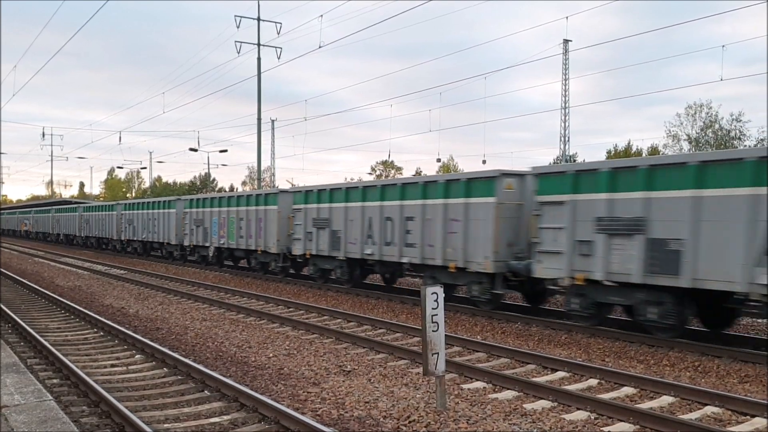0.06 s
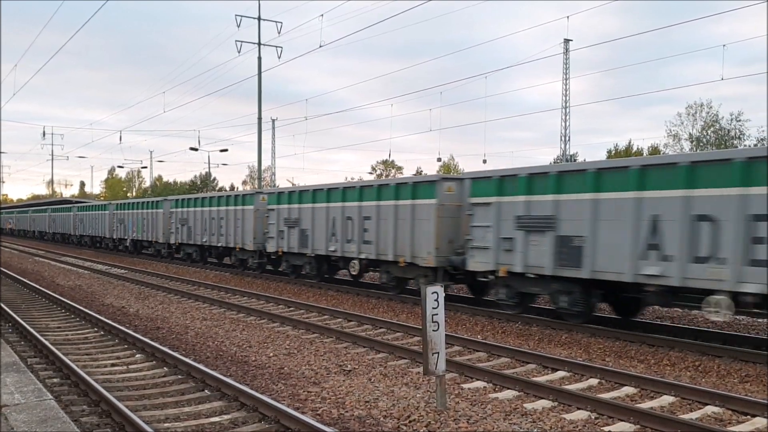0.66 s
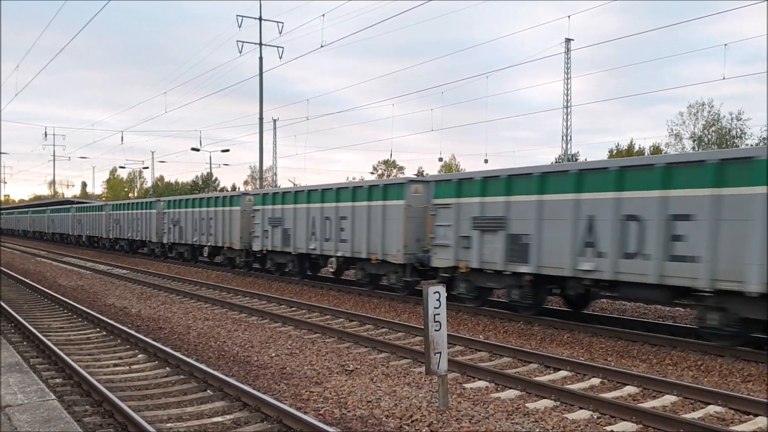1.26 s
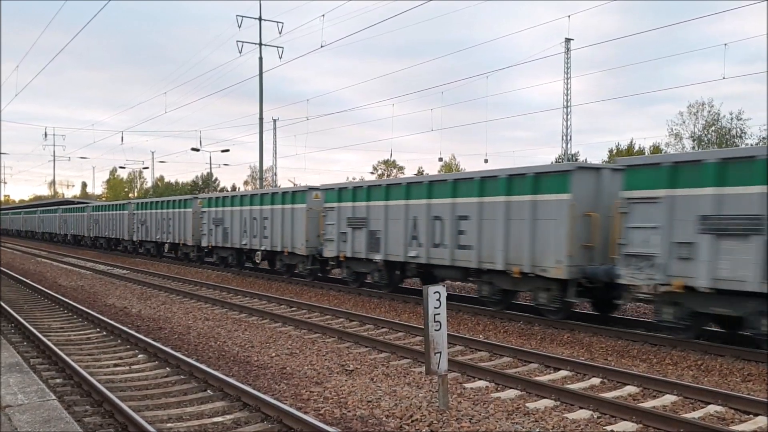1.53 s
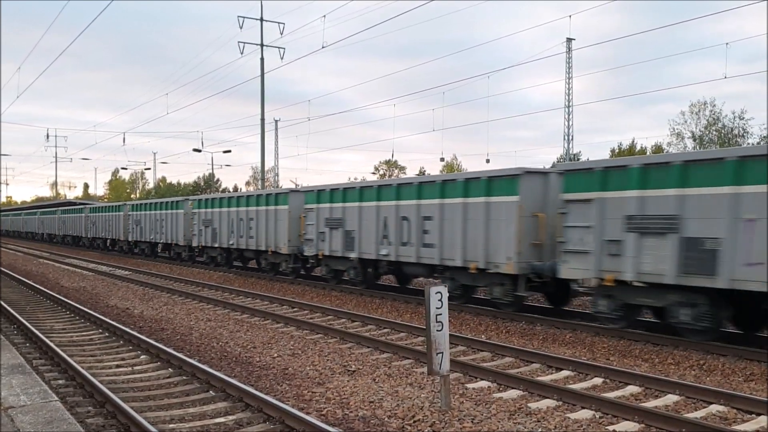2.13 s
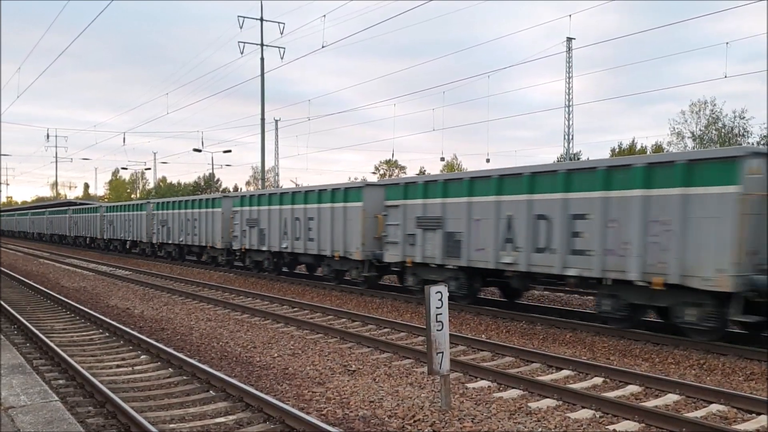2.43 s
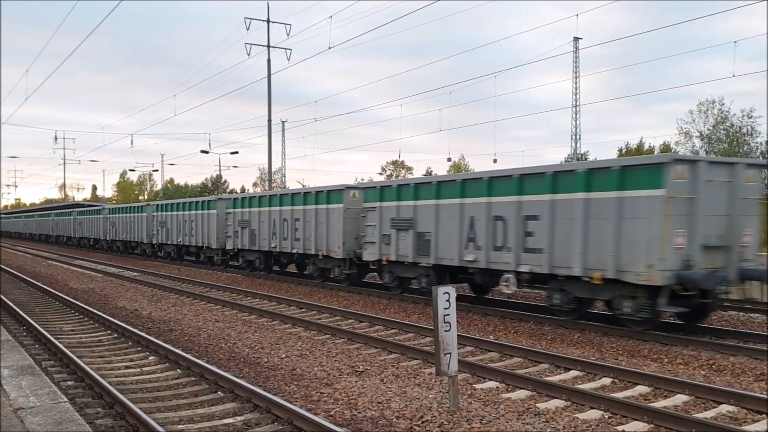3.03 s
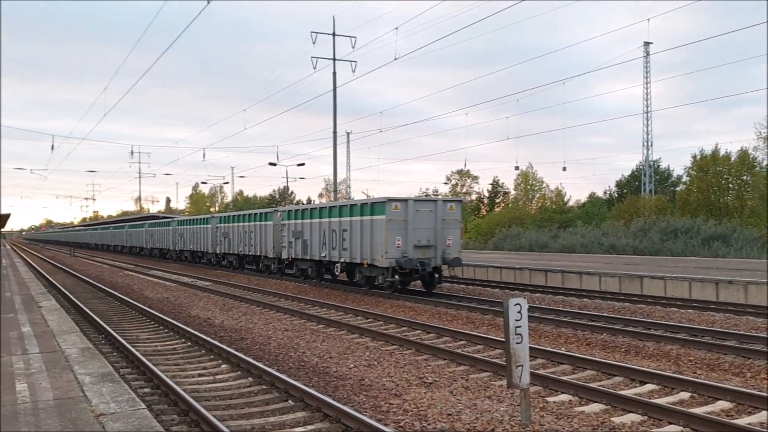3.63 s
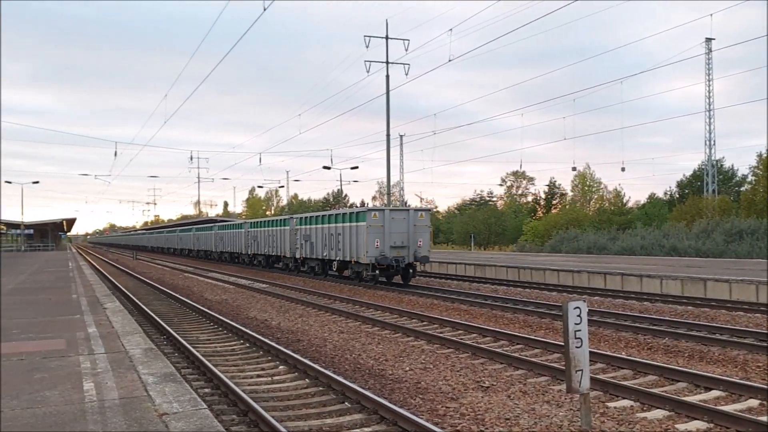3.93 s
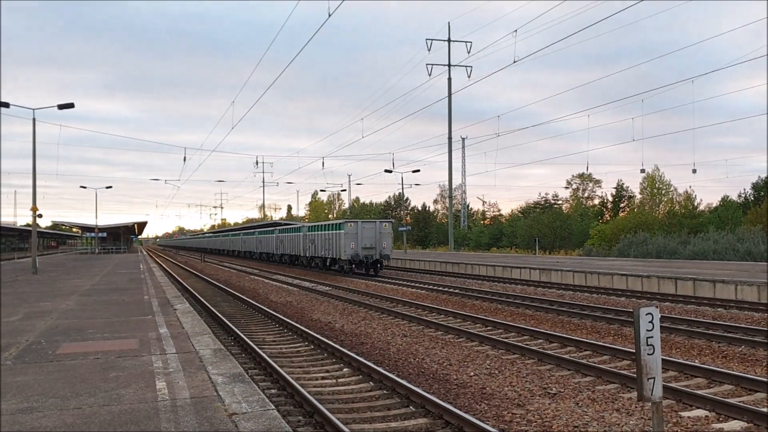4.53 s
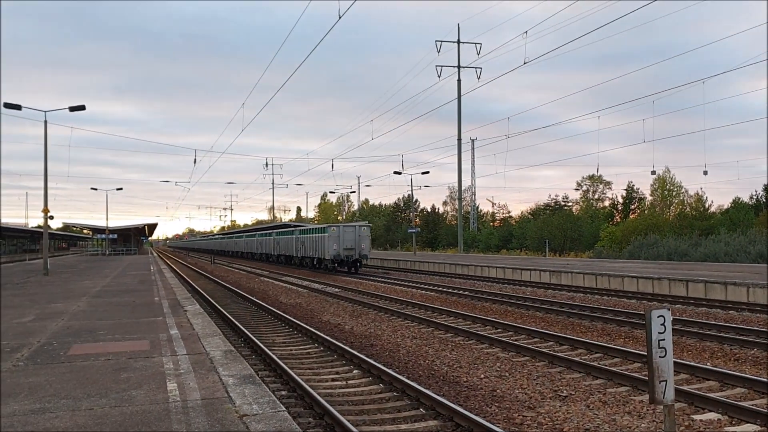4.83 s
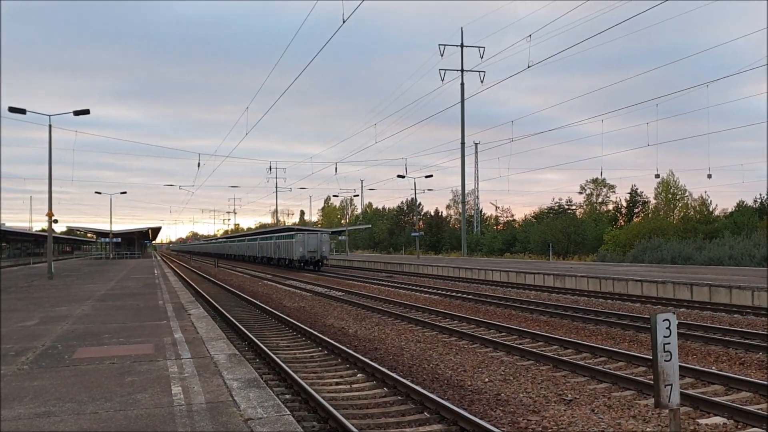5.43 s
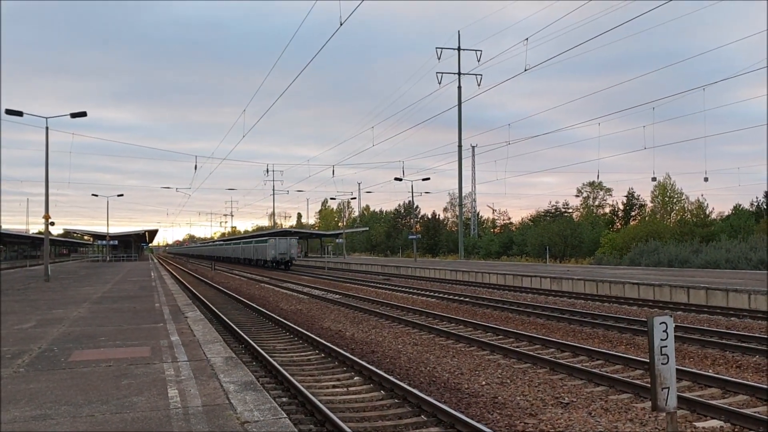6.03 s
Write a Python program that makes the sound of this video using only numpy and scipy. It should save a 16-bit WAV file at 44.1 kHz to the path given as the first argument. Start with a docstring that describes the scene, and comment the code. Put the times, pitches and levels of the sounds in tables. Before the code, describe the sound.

The last wagons of a freight train pass a station platform, heard in stereo from across the tracks. Wind briefly buffets the left microphone as a deep rumble and steel roar fill the air. Worn wheels thump about seven times a second, with clanks, small metal chinks and a scraping hiss. The knocking grows sharper, then the train moves away from about halfway, leaving faint squeals and soft, regular thumps.

```python
"""A freight train rolls away

The last wagons pass a station platform from right to left and fade into the distance.
Rough steel on steel makes wheels, rails and wagon bodies roar. Worn wheels thump and knock about
seven times a second, and the running gear clanks. Two microphones listen from across the tracks."""
import sys
import numpy as np
from scipy import signal
from scipy.fft import rfft, irfft, next_fast_len
from scipy.io import wavfile
from scipy.ndimage import uniform_filter1d

SR = 44100
rng = np.random.default_rng(int(sys.argv[2]) if len(sys.argv) > 2 else 0)


def wrap_up_sound(samples):
    """Save the sound to the file named by the first command line argument, as 16-bit audio."""
    columns = np.atleast_2d(samples).T
    # keep every value between -1 and 1, then stretch to whole-number steps
    tamed = np.clip(columns, -1, 1)
    steps = np.round(tamed * 32767).astype(np.int16)
    wavfile.write(sys.argv[1], SR, steps)


N = 276948
TIME = np.arange(N) / SR

# Where the train is. Each row: time in seconds, distance (0 alongside, 1 leaving, 2 far away).
TRAIN_PATH = [(0, 0), (2.3, 0.089), (2.8, 0.25), (3.1, 0.46), (3.4, 0.75), (4.2, 1.47), (4.9, 1.53),
              (6.28, 1.46)]
# How their housing makes the two microphones differ. Each row: frequency in Hz, likeness (1 is
# identical) and the left one's lead in radians with the train alongside, then both with it far off.
MIC_HOUSING = [(60, 0.8, 0.13, 0.99, 0.21), (202, 0.79, -0.75, 1, -0.38), (494, 0.86, -1.2, 0.94, -0.4),
               (740, 0.58, -1.57, 1, 0.4), (917, 0.91, -2, 0.13, -1.5), (1090, 0.81, -3, 0.29, -1.4),
               (1243, 0.41, 2.5, 0.63, 0.5), (1380, 0.94, 2, 0.24, 1.5), (1615, 0.39, 3, 0.4, 0),
               (1704, 0.16, 1.5, 0.68, -0.8), (1770, 0.49, 0, 0.7, -0.4), (2110, 0.66, 0.1, 0.72, 0.7),
               (2350, 0.46, 0.6, 0.56, 1.2), (2620, 0.24, -2.5, 0.28, -1.8), (2950, 0.95, -0.55, 0.29, 3.2),
               (3100, 0.54, -1.5, 0.36, 1.5), (3400, 0.3, -3.0, 0.16, -0.7), (3620, 0.41, 3, 0.29, 0.7),
               (4290, 0.17, 0.7, 0.45, 0.95), (4660, 0.16, -0.4, 0.41, 1.2), (5350, 0.13, -2, 0.19, 1.2),
               (7100, 0.12, -0.8, 0.31, 2.1), (8350, 0.12, 0, 0.14, 1.3), (10500, 0.12, 1.5, 0.15, -3.04),
               (11800, 0.13, 4.5, 0.17, -1), (13000, 0.12, 1.5, 0.26, -3)]


def rolling():
    """Rough wheels on rough rails shake the ground, the wagon bodies, the rails and the wheels."""
    # The tone of the ground and of the rails. Each row: frequency in Hz, relative level in dB.
    ground_tone = [(15, -30), (28, -29), (37, -4), (47, 4.5), (57, 7), (72, 1.5), (90, -1), (115, -11.5),
                   (200, -48.5)]
    rail_tone = [(250, -59), (380, -23), (460, 2.5), (560, 0.5), (720, 3), (830, -2), (1000, -4.5),
                 (1150, -21), (1600, -54)]
    # How hard the ground and the bodies shake. Each row: time in seconds, relative level in dB.
    ground_levels = [(0, -26), (.42, -29), (.56, -30), (.63, -36), (.72, -28), (1.6, -32), (2.2, -27),
                     (2.8, -26), (3.3, -32), (4.2, -38.5), (5, -42), (6.28, -40)]
    body_levels = [(0.42, -25), (0.63, -31.5), (0.69, -25.5), (0.77, -29), (1.2, -30.5), (2.42, -24),
                   (3.0, -31), (3.3, -32), (3.88, -39.5), (5.9, -42)]
    # How loud the steel roars. Each row: time in seconds, relative rail and wheel levels in dB.
    steel_levels = [(0.0, -40.5, -30.5), (0.31, -36.5, -31.5), (0.56, -40.5, -33.5), (1.22, -39, -33.5),
                    (2.12, -37, -30), (2.97, -36, -33), (3.65, -43, -39), (4.81, -52, -49),
                    (6.19, -52.5, -52), (6.28, -48, -49)]
    ground_db, = curves(ground_levels, TIME)
    body_db, = curves(body_levels, TIME)
    rail_db, wheel_db = curves(steel_levels, TIME)
    ground = roar(steady(ground_tone), patchy_db=-1, patch_s=0.089, patch_hz=40, size=4096)
    body = roar(body_colour, patchy_db=1.5, patch_s=0.045, patch_hz=40, size=4096)
    rail = roar(steady(rail_tone), patchy_db=1.5, patch_s=0.046, patch_hz=148, size=1024)
    wheels = roar(wheel_colour, patchy_db=2.5, patch_s=0.043, patch_hz=43.4, size=4096)
    contact = flutter(depth_db=0.8, rate_hz=17.4)  # one contact drives both wagon and rail
    body *= gain_of(body_db + 0.37) * contact
    rail *= gain_of(rail_db + 0.4) * contact * flutter(depth_db=0.5, rate_hz=82)
    wheels *= gain_of(wheel_db + 2.5) * flutter(depth_db=1, rate_hz=11.7)
    return gain_of(ground_db) * ground + body + rail + wheels


def wheel_colour(t, hz):
    """Steel wheels ring at many pitches, blurred nearby and mostly sharper far away. Gives dB."""
    # The ringing at three distances. Each row: pitch in Hz, width in Hz, relative level in dB.
    near = [(1248, 270, -3), (1347, 410, -1.5), (1825, 75, -7.5), (1920, 310, -8), (2180, 370, -5.5),
            (2735, 660, -9.5), (2820, 330, -7.5), (3395, 570, -10), (4330, 640, -16), (5160, 2400, -18.5)]
    leaving = [(1217, 205, 0.5), (1824, 95, -1), (2010, 380, -8), (2630, 590, -9), (3050, 520, -13.5),
               (3400, 210, -14.5), (4210, 84, -11), (4800, 92, -24)]
    far = [(1190, 120, -1.5), (1396, 150, -1.5), (1860, 170, -2.5), (1960, 810, -11), (2440, 110, -1.5),
           (2760, 730, -9), (3100, 150, -13), (3540, 350, -12.5), (4134, 97, -7.5), (4800, 410, -16.5)]
    power = 0
    for stage, modes in enumerate([near, leaving, far]):
        share = np.maximum(1 - abs(distance(t) - stage), 0)
        power = power + share * resonances(modes, hz)
    return decibels(power)


def body_colour(t, hz):
    """Wagon bodies rumble, and their panels drone for a while as they pass. Gives dB."""
    # The rumble nearby and far away. Each row: frequency in Hz, relative level in dB.
    near = [(60, -48), (90, -1.5), (120, 1), (160, 0.5), (190, -2), (250, -4.5), (320, -7.5), (400, -13),
            (500, -31), (900, -43)]
    far = [(60, -39), (90, -8), (120, 0), (155, 2.5), (190, -3.5), (230, -3.5), (275, -8), (330, -11.5),
           (400, -12.5), (500, -17), (900, -50)]
    peak_s, spread_s, drone_hz, width_hz, drone_db = 1.5, 0.87, 411, 61, 5.5
    swell = np.exp(-((t - peak_s) / spread_s) ** 2)
    band = 1 / (1 + ((hz - drone_hz) / width_hz) ** 4)
    return by_distance(near, far)(t, hz) + drone_db * swell * band


def wheel_strikes():
    """Worn wheels boom, knock and clank as they pass, then keep thumping once a turn as they recede."""
    # Deep booms. Each row: time in seconds, relative level in dB, pitch in Hz.
    passing_booms = [(0.09, -17, 73.6), (0.22, -15, 68.3), (0.3, -23, 73), (0.37, -20, 80),
                     (0.43, -19, 61.8), (0.7, -18, 65.86), (0.78, -26, 57.5), (0.88, -21, 63.1),
                     (0.93, -20, 60.4), (0.97, -18, 68.2), (1.08, -20.5, 73.6), (1.19, -20.0, 63.7),
                     (1.26, -29, 65.34), (1.32, -28, 68.3), (1.4, -23, 60.5), (1.44, -18.5, 67.5),
                     (1.5, -24, 59.5), (1.57, -21.5, 57), (1.62, -22.5, 71.9), (1.68, -20.5, 61.75),
                     (1.76, -17, 73.1), (1.87, -23.5, 71.9), (1.94, -25, 58.6), (2.06, -13.5, 60.4),
                     (2.15, -16.5, 73.5), (2.2, -10.5, 67.7), (2.33, -17.5, 69.4), (2.41, -28, 73.3),
                     (2.48, -18, 59.9), (2.55, -23, 74.6), (2.62, -29, 60.33), (2.69, -16.5, 65.4),
                     (2.75, -14.5, 69.66), (2.84, -14.5, 72.2), (2.92, -30, 72.8), (3.01, -28, 57.8),
                     (3.07, -22, 68.2), (3.15, -20.5, 62), (3.2, -23.5, 72.8), (3.27, -26, 64.5),
                     (3.35, -30, 66.1), (3.43, -25.5, 68.2), (3.49, -23, 67.83), (3.57, -24, 66.9),
                     (3.64, -24.0, 69.9), (3.71, -22, 68.2), (3.78, -23, 66.95), (3.86, -28, 66.6),
                     (3.94, -23, 68), (3.99, -23.5, 64.9), (4.07, -38, 67.7)]
    # Wheels knock on the rail. Each row: start in seconds, level in dB.
    passing_knocks = [(0.94, -32), (1.738, -35), (2.172, -25.5), (2.301, -27), (2.436, -23), (2.458, -28),
                      (2.569, -23.5), (2.592, -26.5), (2.655, -25), (2.71, -22), (2.789, -27.5),
                      (2.853, -23), (2.911, -27.5), (2.928, -29), (2.979, -27), (2.991, -25.5),
                      (3.062, -30), (3.125, -29), (3.203, -25.5), (3.34, -29.5), (3.428, -37), (3.49, -34),
                      (3.629, -37), (3.76, -40), (3.9, -41), (4.041, -32), (4.192, -38)]
    # Wheels are jolted. Each row: start in seconds, relative level in dB, boosted pitch in Hz.
    passing_clanks = [(1.42, -23, 1350), (1.735, -21, 1354), (1.791, -20.5, 1384), (1.915, -29, 1340),
                      (1.932, -23.5, 2105), (1.986, -20, 1334), (2.009, -24, 2025), (2.119, -25, 1380),
                      (2.207, -24, 1390), (2.434, -27, 1272), (2.52, -24, 2228), (2.652, -19, 1400),
                      (2.779, -28, 2120), (2.855, -29, 2110), (2.98, -22, 1273), (3.122, -33, 1320),
                      (3.212, -36, 1840), (3.268, -23.5, 1230), (3.319, -29, 1836), (3.345, -27, 1310),
                      (3.416, -40, 1797), (3.467, -29, 1260), (3.54, -29, 1224), (3.616, -30.5, 1880),
                      (3.654, -29.5, 1830), (3.718, -40, 1828), (3.904, -33, 1827), (4.044, -40, 1825),
                      (4.095, -38, 1820), (4.335, -38, 1842), (4.403, -43, 1823), (4.5, -38, 1827)]
    # Wheels with a flat spot. Each row: the times in seconds when it passes and when its far-off
    # strikes begin and end, then the relative levels of its boom, knock and clank in dB.
    worn_wheels = [(2.301, 4.08, 6.28, -21.5, -26, -25), (2.652, 4.12, 6.28, -26, -25, -31)]
    # How boom, knock and clank carry. Each row: metres down the track where it is loudest,
    # dB lost each time the distance doubles.
    carry = [(-12, 1.5), (8, 10.5), (-2, 9)]
    turn_s, speed_m_per_s, to_track_m, sound_m_per_s = 0.1325, 22, 8, 343
    scatter_db, boom_lag_s, boom_hz, clank_hz = 1.9, 0.025, 70.8, 1810
    booms, knocks, clanks = list(passing_booms), list(passing_knocks), list(passing_clanks)
    loudest_m, fall_db = np.transpose(carry)
    for passes_s, begin_s, end_s, *levels in worn_wheels:
        for since_s in np.arange(32) * turn_s:
            along_m = speed_m_per_s * since_s
            delay_s = (np.hypot(to_track_m, along_m) - to_track_m) / sound_m_per_s
            heard_s = passes_s + since_s + delay_s
            doublings = np.log2(np.hypot(1, (along_m - loudest_m) / to_track_m))
            uneven_db = scatter_db * rng.standard_normal(len(levels))
            boom_db, knock_db, clank_db = levels - fall_db * doublings + uneven_db
            if begin_s < heard_s < end_s:
                booms.append((heard_s + boom_lag_s, boom_db, boom_hz))
                knocks.append((heard_s, knock_db))
                clanks.append((heard_s, clank_db, clank_hz))
    return booms, knocks, clanks


def wagon_booms(rows, length_s=0.12, level_db=-4):
    """Each strike makes an empty wagon boom: a short, deep tone with a wobbling pitch."""
    window = np.hanning(round(length_s * SR))
    power = np.zeros(N)
    for middle_s, db, _ in rows:
        add(power, middle_s - length_s / 2, (gain_of(db + level_db) * window) ** 2)
    _, pitch_hz = curves(sorted(map(tuple, rows)), TIME)
    wobble = flutter(depth_db=6, rate_hz=7)
    cycles = np.cumsum(pitch_hz + 3 * (wobble - wobble.mean())) / SR + rng.random()
    balance = gain_of([[0.2], [-0.2]])  # a little louder on the left
    return np.sqrt(2 * power) * np.sin(2 * np.pi * cycles) * balance


def track_knocks(rows):
    """The track rings when a wheel hits it; its lowest note fades as the train leaves."""
    # How the track rings. Each row: pitch in Hz, width in Hz, relative level in dB.
    modes = [(268, 210, -7.5), (567, 140, 0), (715.5, 110, 1), (860, 380, -7), (1314, 108, -6),
             (2300, 1900, -18)]

    def colour(t, hz):
        bass_loss_db = 14 * np.minimum(distance(t), 1) ** 0.81 * np.exp(-(hz / 430) ** 4)
        return decibels(resonances(modes, hz)) - bass_loss_db
    return blows(rows, colour, contact_s=0.0095, rattle=0.19, detune=0.075, spread=0.17, level_db=0)


def low_thuds():
    """Low thuds: two puffs of wind on the microphone, then thuds from passing wagons."""
    # Each row: start in seconds, relative level in dB.
    thuds = [(0.052, -22), (0.128, -19), (0.835, -24), (0.857, -29), (0.995, -26), (1.058, -23),
             (1.548, -22), (1.68, -32), (1.917, -16.5), (1.995, -22), (2.055, -20), (2.185, -20),
             (2.222, -30), (2.302, -20.5), (2.452, -27), (2.735, -32), (2.912, -19), (2.985, -25),
             (3.38, -35), (3.695, -32)]
    # The low notes in a thud. Each row: pitch in Hz, width in Hz, relative level in dB.
    modes = [(165, 62, -2), (246, 114, 3.5), (358, 170, -4)]
    return blows(thuds, lambda t, hz: decibels(resonances(modes, hz)),
                 contact_s=0.016, rattle=0.15, detune=0.13, spread=0.27, level_db=-3)


def wheel_clanks(rows, top_hz=2900):
    """A heavy jolt sets a wheel ringing, but hardly stirs its notes above top_hz."""
    def colour(t, hz, pitch):
        return wheel_colour(t, hz) - decibels(1 + (hz / top_hz) ** 6) + favoured(hz, pitch)
    return blows(rows, colour, contact_s=0.01, rattle=0.11, detune=0.012, spread=0.27, level_db=-5.5)


def rubbing():
    """Wheels and their rims scrape the rail with a flickering hiss, and grit crackles under them."""
    # The tone of near hiss, far hiss and grit. Each row: frequency in Hz, relative level in dB.
    hiss_near = [(1500, 4.5), (3800, -0.5), (5300, -1), (6100, -5.5), (6900, -4), (7600, -5.5), (8300, -3),
                 (9600, -9.5), (11000, -8), (12800, -8), (14200, -15), (15600, -23)]
    hiss_far = [(1500, -23), (3800, 1.5), (5400, 0.5), (6300, -9.5), (7000, -5.5), (7700, -10.5),
                (8400, -12.5), (9600, -16.5), (11300, -14), (12200, -16), (14200, -22), (15600, -39)]
    grit_tone = [(2000, -25), (6000, 14), (12500, -7.5), (15600, -4)]
    # How loud the rubbing is. Each row: time in seconds, relative level in dB.
    levels = [(0, -38), (0.6, -45), (1.5, -43.5), (2.6, -39.5), (3.1, -47.5), (3.7, -51.5), (4.4, -54),
              (4.8, -60.5), (6.28, -67.5)]
    # A rim briefly scrapes harder. Each row: time in seconds, extra level in dB.
    scrapes = [(0.12, 4), (0.46, 2.5), (0.65, 2.5), (0.95, 5.5), (1.16, 5), (1.7, 2), (1.97, 0),
               (3.17, 3.5), (3.88, 3)]
    grains_per_s, grain_decay_s, scrape_s = 170, 0.0032, 0.18
    hiss = roar(by_distance(hiss_near, hiss_far), patchy_db=4, patch_s=0.025, patch_hz=100, size=1024)
    hiss *= flutter(depth_db=1, rate_hz=16)
    grain_starts = rng.random(N) < grains_per_s / SR
    grains = grain_starts * gain_of(3.5 * np.minimum(rng.exponential(1, N), 2.5))
    bursts = signal.lfilter([1], [1, -np.exp(-1 / (grain_decay_s * SR))], grains)
    grit = bursts * roar(steady(grit_tone), patchy_db=-2.5, patch_s=0.004, patch_hz=900, size=256)
    level_db, = curves(levels, TIME)
    for middle_s, db in scrapes:
        add(level_db, middle_s - scrape_s / 2, db * np.hanning(int(scrape_s * SR)))
    return gain_of(level_db) * (gain_of(4.5) * hiss + gain_of(-7) * evened(grit))


def squeals():
    """Slipping steel sings fuzzy, overlapping notes, each swelling and fading."""
    # Each row: start in seconds, length in seconds, pitch in Hz, width in Hz, level in dB.
    slips = [(0, 0.51, 2845, 110, -40.5), (0.7, 1.3, 2870, 120, -47.5), (0.875, 0.2, 13500, 2000, -52),
             (1.134, 0.038, 8300, 220, -42), (1.154, 0.022, 5900, 300, -45), (3, 0.29, 1900, 240.4, -44.5),
             (2.945, 0.087, 3340, 90, -38), (3.083, 0.055, 3300, 80, -38), (3.3, 0.043, 1833, 35, -34),
             (3.378, 0.088, 1843, 35, -36), (3.501, 0.45, 1840, 35, -45), (3.88, 0.34, 1808, 25, -46),
             (4.32, 0.115, 1852, 25, -46.5), (4.45, 0.7, 1833, 25, -53), (4.203, 0.15, 2455, 90, -47),
             (3.841, 0.23, 4760, 110, -49.5), (4.22, 0.18, 4800, 110, -55), (3.71, 0.78, 8300, 160.2, -68),
             (3.554, .32, 12400, 1006, -61), (4.04, 0.19, 12500, 1180, -57), (4.34, .12, 12500, 900, -66),
             (4.841, .28, 12200, 599, -66), (5.201, 1.3, 12150, 500, -72), (4.882, 0.28, 6860, 499, -70),
             (5.256, 0.3, 6898, 594, -66), (5.51, 0.48, 6872, 502, -70), (5.981, 0.37, 6910, 600, -69)]
    out = np.zeros((2, N))
    for start_s, length_s, pitch, width, db in slips:
        size = next_fast_len(int(length_s * SR))
        slip = stereo(likeness(start_s + length_s / 2, pitch), *rng.standard_normal((2, size)))
        ring = 1 / (1 + (2 * (np.fft.rfftfreq(size, 1 / SR) - pitch) / width) ** 2)
        tone = evened(irfft(rfft(slip) * ring, size))
        add(out, start_s, gain_of(db) * tone * signal.windows.tukey(size, 0.7))
    return out


def gear_chinks():
    """Loose chains and brake rods hit each other with small, bright chinks."""
    # The hits. Each row: start in seconds, level in dB, boosted pitch in Hz.
    hits = [(0.026, -34, 12800), (0.109, -38, 6900), (0.336, -43, 7500), (0.46, -42, 6960),
            (0.636, -41, 8200), (0.921, -38, 7100), (1.005, -38, 13440), (1.16, -34.5, 13500),
            (1.219, -49, 8200), (1.364, -40, 8100), (1.481, -42, 6960), (1.629, -39, 6900),
            (1.719, -44, 12800), (1.99, -46, 13400), (2.134, -44, 6880), (2.274, -42, 7200),
            (2.463, -44, 8220), (2.584, -41, 7200), (2.649, -42, 7150), (2.921, -46, 7090),
            (3.172, -45, 5700)]
    # How the loose steel rings. Each row: pitch in Hz, width in Hz, relative level in dB.
    modes = [(5500, 1100, -3), (6700, 700, 5), (8200, 630, -8), (10500, 3300, -7), (13200, 2000, -4)]
    return blows(hits, lambda t, hz, pitch: decibels(resonances(modes, hz)) + favoured(hz, pitch),
                 contact_s=0.0039, rattle=0.45, detune=0.04, spread=0.49, level_db=0)


def gust():
    """The train's draught buffets one microphone in uneven puffs."""
    # The tone of the wind. Each row: frequency in Hz, relative level in dB.
    tone = [(20, -16), (40, -14), (75, 6.5), (115, 3.5), (170, 2.5), (250, -9.5), (350, -9.5), (480, -19),
            (900, -64)]
    # Its strength. Each row: time in seconds, level in dB.
    levels = [(0, -25), (.12, -20), (.27, -13.5), (.38, -23), (.5, -33), (.7, -60), (1, -90)]
    eddies = roar(steady(tone), patchy_db=0.5, patch_s=0.02, patch_hz=101, size=2048)[0]
    return gain_of(curves(levels, TIME)[0]) * eddies * flutter(depth_db=2.5, rate_hz=19)


def microphone_hiss():
    """Faint, steady, high microphone hiss."""
    # Its tone. Each row: frequency in Hz, relative level in dB.
    tone = [(300, 19.5), (3000, -10), (8000, -15), (11200, -18), (12200, 1), (13200, -5), (14200, -4.5),
            (15400, -26)]
    return gain_of(-56) * roar(steady(tone), patchy_db=1.5, patch_s=0.061, patch_hz=200, size=1024)


def blows(rows, colour, contact_s, rattle, detune, spread, level_db, rattle_s=0.049):
    """In each blow, a brief rough contact and the rattle after it make the struck part ring."""
    out = np.zeros((2, N))
    t = np.arange(4096) / SR
    hz = abs(np.fft.fftfreq(len(t), 1 / SR))
    force = np.exp(-(t / contact_s) ** 2) + rattle * np.exp(-(t / rattle_s) ** 2)
    for start_s, db, *pitch in rows:
        common, apart = rng.standard_normal((2, len(t))) * force
        contact = np.fft.fft([common + spread * apart, common - spread * apart])
        detuned_hz = hz * (1 + detune * rng.uniform(-0.83, 1))
        log_gain = np.log(gain_of(colour(start_s, detuned_hz, *pitch)))
        ring = np.exp(signal.hilbert(log_gain).conj())  # rings only after the blow, never before
        sound = np.fft.ifft(contact * ring).real
        peak_power = uniform_filter1d((sound ** 2).mean(0), size=300).max()
        add(out, start_s, gain_of(db + level_db) * sound / np.sqrt(peak_power))
    return out


def favoured(hz, pitch, boost_db=15, width_hz=90):
    """Each blow lands so that one pitch rings more strongly. Gives the boost in dB."""
    return boost_db / (1 + ((hz - pitch) / width_hz) ** 2)


def resonances(modes, hz):
    """How a ringing part shares its power among frequencies; the shares add up to 1."""
    power = sum(gain_of(db) ** 2 / (1 + (2 * (hz - f) / width) ** 2) ** 2 for f, width, db in modes)
    return power / power.sum()


def roar(colour, patchy_db, patch_s, patch_hz, size):
    """Stereo noise of level 1, shaped by colour(t, hz) in dB, with patches that swell and fade."""
    t = np.arange(N * 4 // size + 5)[:, None] * size / 4 / SR
    hz = np.fft.rfftfreq(size, 1 / SR)
    common_re, common_im, apart_re, apart_im, patches = rng.standard_normal((5, len(t), len(hz)))
    for axis, steps in enumerate([patch_s / t[1, 0], patch_hz / hz[1]]):  # time, then frequency
        blur = np.expand_dims(signal.windows.gaussian(61, steps / 2), 1 - axis)
        patches = signal.fftconvolve(patches, blur, "same")
    shape = gain_of(colour(t, hz)) * np.ones_like(t)
    shape /= np.linalg.norm(shape, axis=1, keepdims=True)
    noise = stereo(likeness(t, hz), common_re + 1j * common_im, apart_re + 1j * apart_im)
    spectra = shape * gain_of(patchy_db * evened(patches)) * noise
    _, sound = signal.istft(spectra.swapaxes(1, 2), nperseg=size, noverlap=size * 3 // 4)
    return evened(sound[:, :N])


def flutter(depth_db, rate_hz):
    """A gain that jumps about at random, like a contact running over rough steel."""
    hz = np.fft.rfftfreq(N, 1 / SR)
    band = hz / (rate_hz ** 2 + hz ** 2) / (1 + (hz / rate_hz / 2) ** 2)
    bumps = irfft(rfft(rng.standard_normal(N)) * band, N)
    return evened(gain_of(depth_db * evened(bumps)))


def steady(tone):
    """A colour that stays the same over time."""
    return lambda t, hz: level_at(tone, hz)


def by_distance(near, far):
    """A colour that blends from one tone to another as the train moves away."""
    def colour(t, hz):
        away = np.clip(distance(t) / 1.3, 0, 1)
        return (1 - away) * level_at(near, hz) + away * level_at(far, hz)
    return colour


def distance(t):
    """How far off the train is: 0 alongside, 1 leaving, 2 far away."""
    return curves(TRAIN_PATH, t)[0]


def ahead(t):
    """0 while the train is to the right, 1 once it is straight ahead."""
    return np.interp(distance(t), [0.09, 0.86], [0, 1])


def likeness(t, hz):
    """How alike the two microphones sound as the train moves."""
    f, near, _, far, _ = np.transpose(MIC_HOUSING)
    blend = (1 - ahead(t)) * np.interp(hz, f, near) + ahead(t) * np.interp(hz, f, far)
    return np.clip(blend, 0, 0.995)


def stereo(same, common, apart):
    """Left and right from two unrelated noises, as alike as `same` says."""
    common, apart = np.sqrt(1 + same) * common, np.sqrt(1 - same) * apart
    return np.array([common + apart, common - apart])


def round_the_housing(sound):
    """The way round to the left microphone shifts each wave, depending on where the train is."""
    f, _, near, _, far = np.transpose(MIC_HOUSING)
    hz, t, spectra = signal.stft(sound, SR, nperseg=1024, noverlap=768)
    near, far = (np.interp(hz, f, np.exp(1j * phase))[:, None] for phase in (near, far))
    lead = np.angle((1 - ahead(t)) * near + ahead(t) * far)
    return signal.istft(spectra * np.exp(1j * lead), SR, nperseg=1024, noverlap=768)[1][:N]


def gain_of(db):
    """Turns decibels into a gain."""
    return 10 ** (np.asarray(db) / 20)


def decibels(power):
    """Turns power into decibels."""
    return 10 * np.log10(power + 1e-9)


def evened(x):
    """Scales a signal to an average (rms) level of 1."""
    return x / np.sqrt(np.mean(x ** 2) + 1e-20)


def level_at(tone, hz):
    """Looks up a tone table in dB, with octaves evenly spaced."""
    f, db = np.transpose(tone)
    return np.interp(np.log(hz + 1), np.log(f + 1), db)


def curves(rows, t):
    """Looks up every column of a time table at the times t."""
    times, *columns = np.transpose(rows)
    return [np.interp(t, times, column) for column in columns]


def add(mix, start_s, sound):
    """Mixes a sound in at start_s, cutting off what does not fit."""
    start = round(start_s * SR)
    sound = sound[..., max(-start, 0):]
    part = mix[..., max(start, 0):][..., :sound.shape[-1]]
    part += sound[..., :part.shape[-1]]


def scene():
    """The train at both microphones, with their faint hiss and a gust on the left."""
    booms, knocks, clanks = wheel_strikes()
    train = rolling() + rubbing() + wagon_booms(booms) + squeals()
    train += track_knocks(knocks) + low_thuds() + wheel_clanks(clanks) + gear_chinks()
    left, right = train
    return microphone_hiss() + np.array([round_the_housing(left) + gust(), right])


def record(dry):
    """The housing gives each microphone its own tone, and the highest treble is cut off."""
    # Each row: frequency in Hz, how much louder the left is than the right in dB.
    balance = [(100, 0.26), (700, 0), (1150, 2.5), (1400, -2), (1700, 0.5), (2250, -2), (2600, 0.5),
               (2880, -4), (3200, 1.3), (4200, -0.8), (10000, 0.5), (12800, -2), (15000, 0)]
    left_gain = gain_of(level_at(balance, np.fft.rfftfreq(N, 1 / SR)) / 2)
    heard = irfft(rfft(dry) * np.array([left_gain, 1 / left_gain]), N)
    treble_cut = signal.firwin(511, cutoff=15650, window=("kaiser", 9), fs=SR)
    return signal.oaconvolve(heard, treble_cut[None], "same")


dry = scene()
out = record(dry)
wrap_up_sound(out)
```